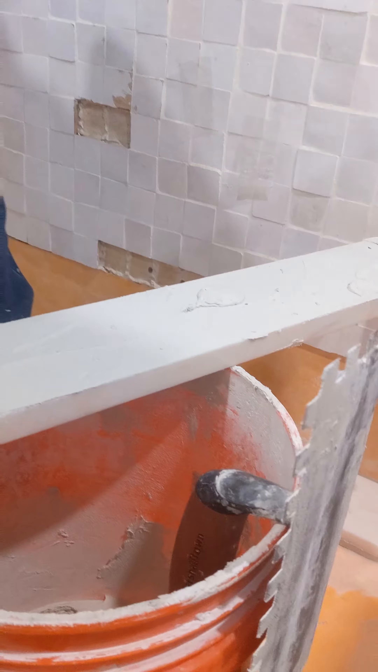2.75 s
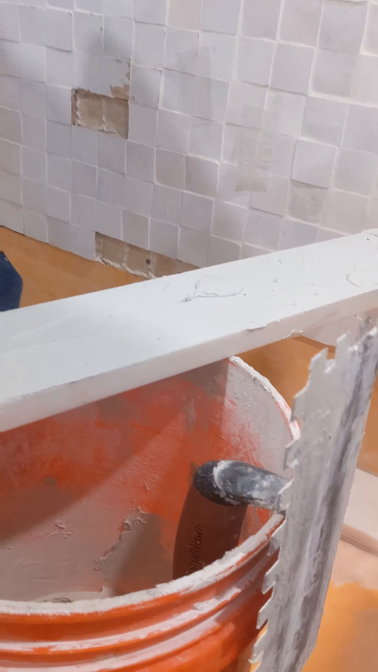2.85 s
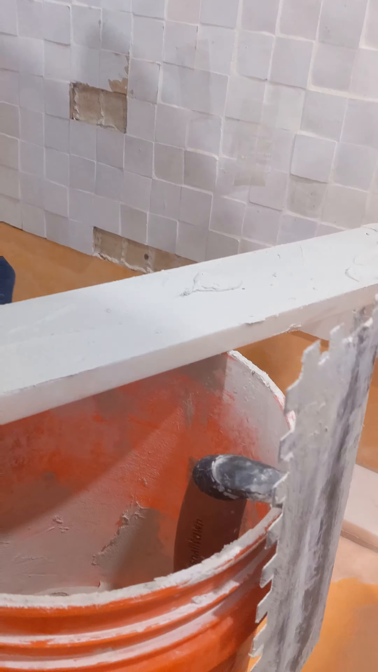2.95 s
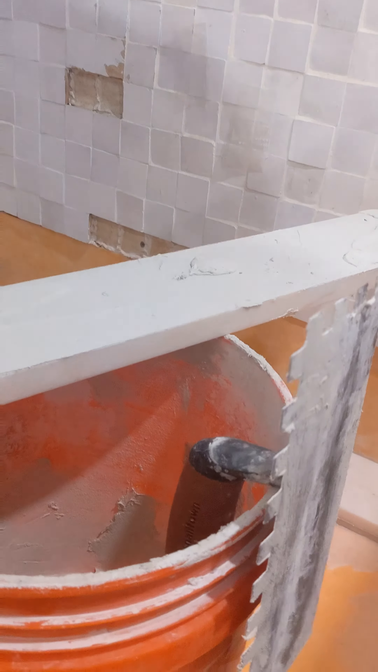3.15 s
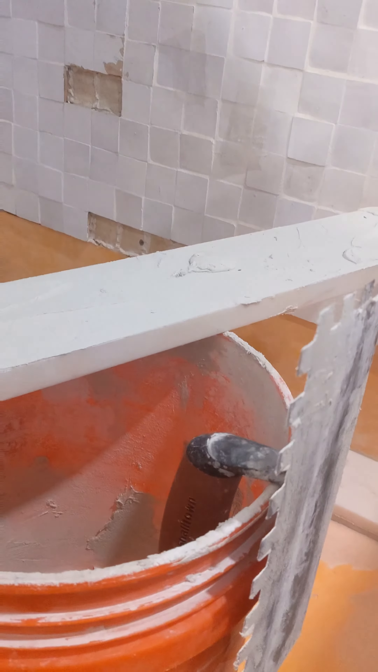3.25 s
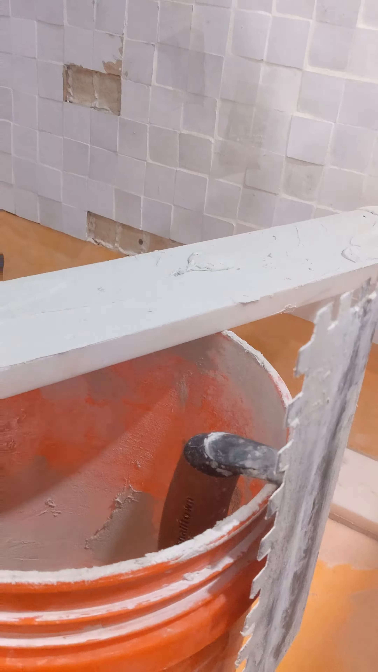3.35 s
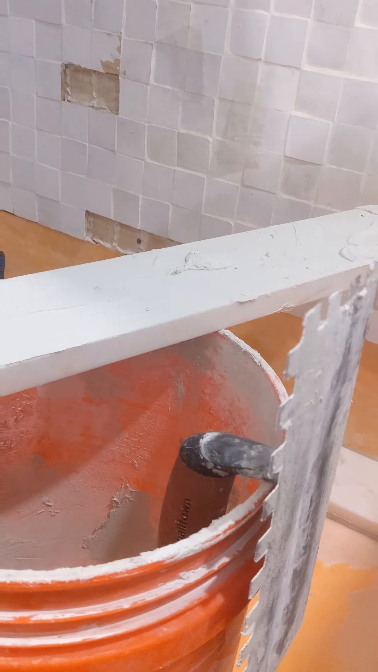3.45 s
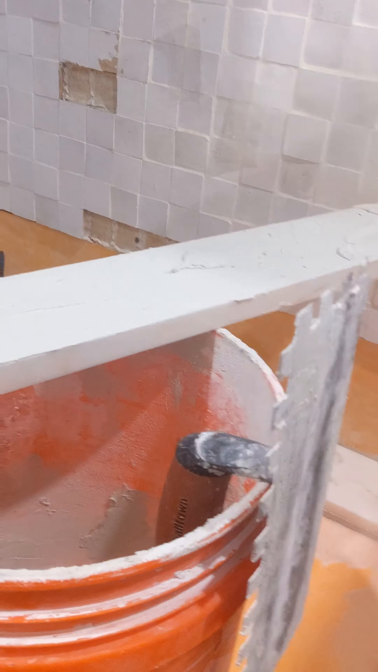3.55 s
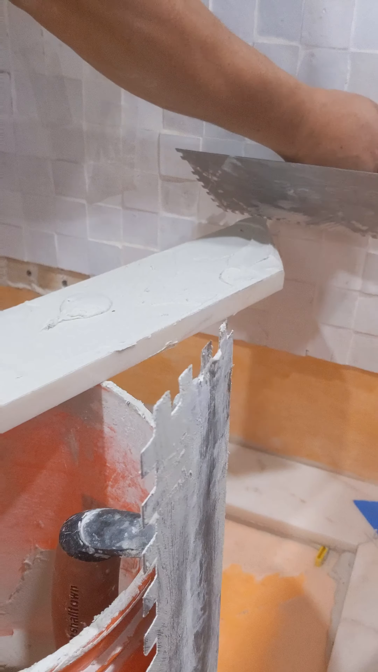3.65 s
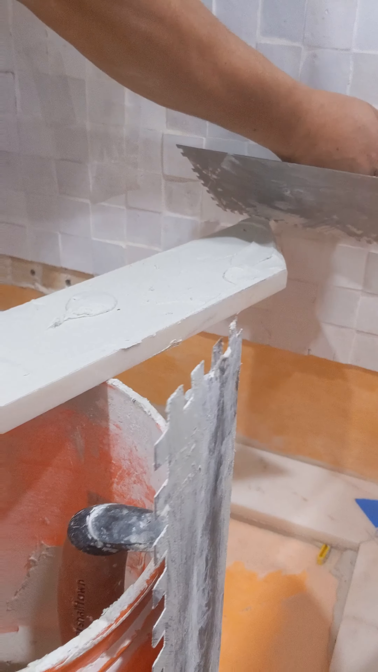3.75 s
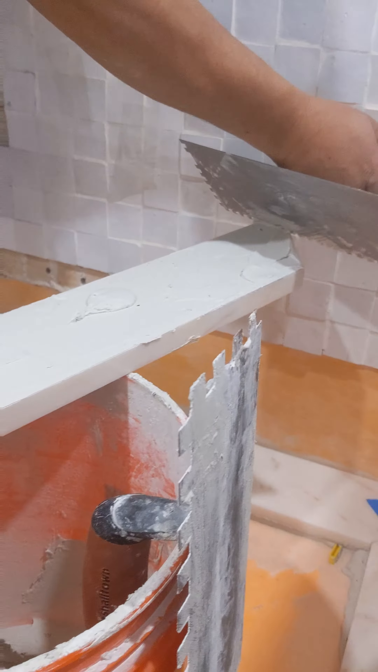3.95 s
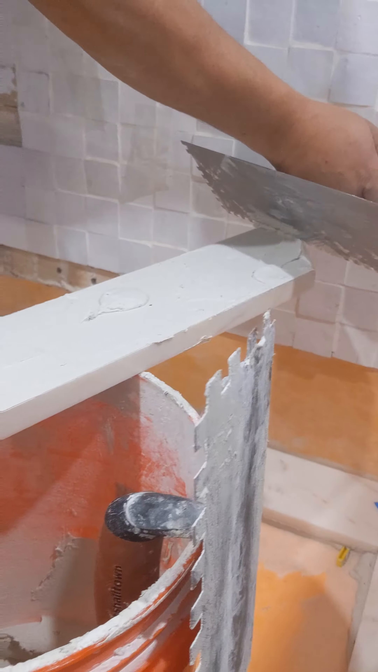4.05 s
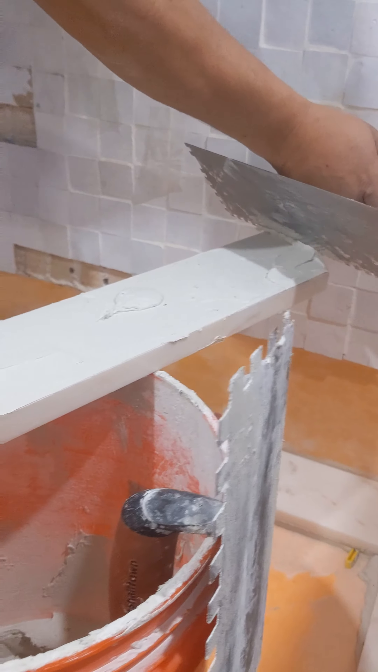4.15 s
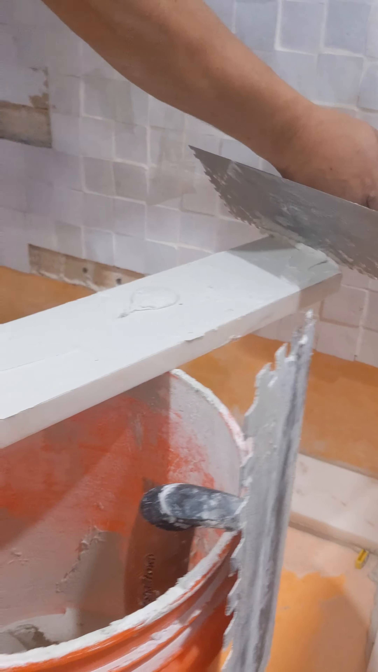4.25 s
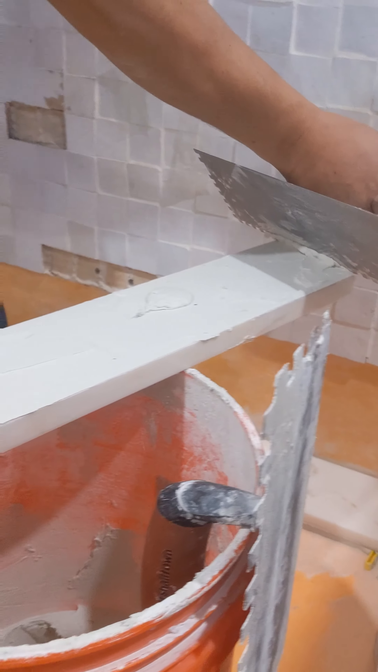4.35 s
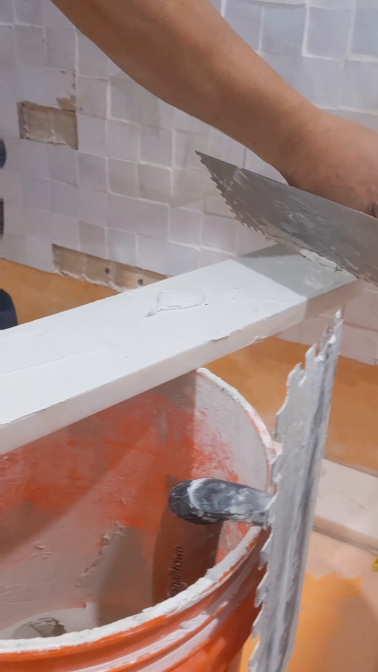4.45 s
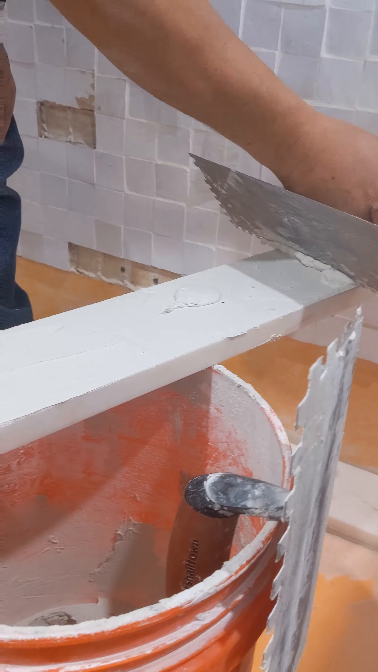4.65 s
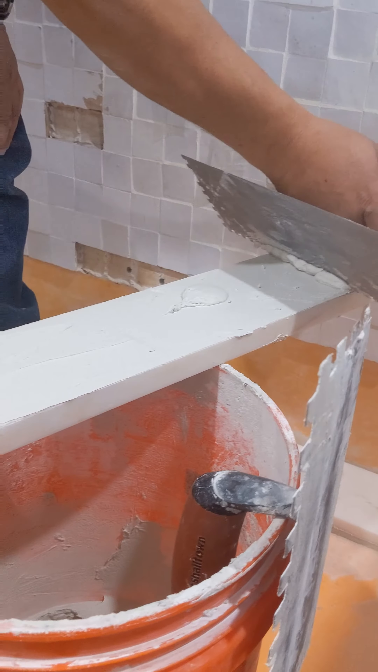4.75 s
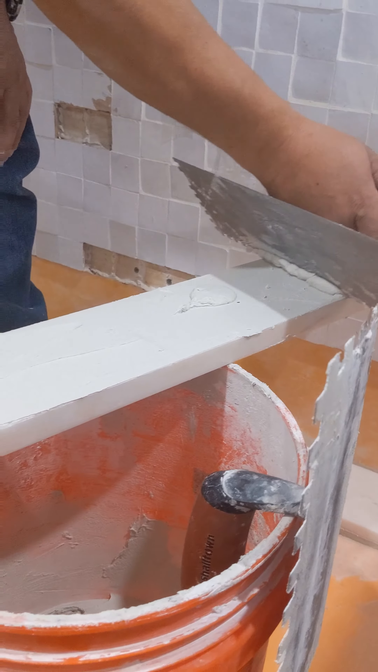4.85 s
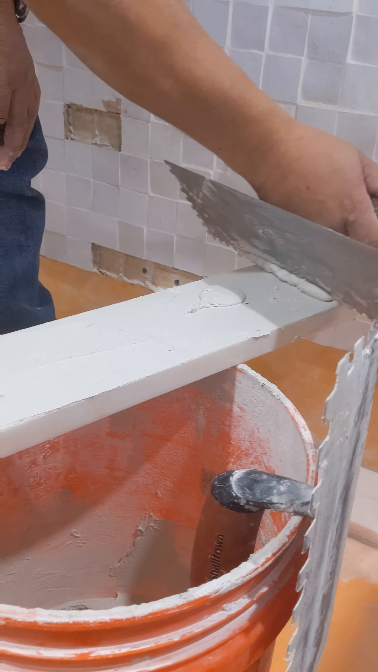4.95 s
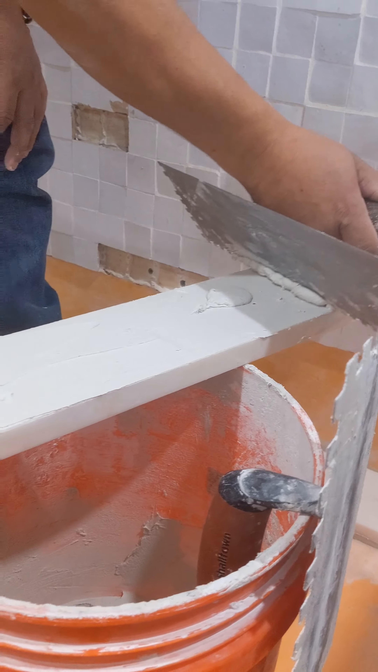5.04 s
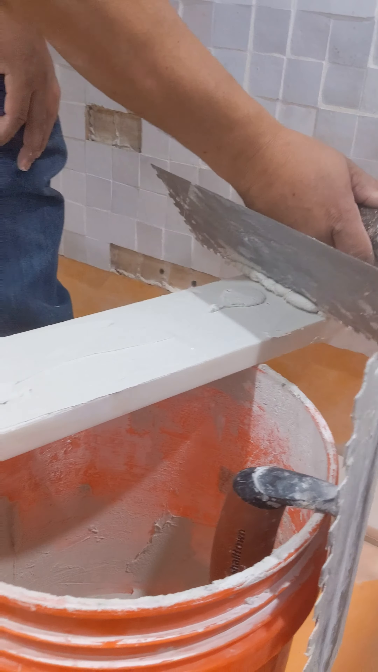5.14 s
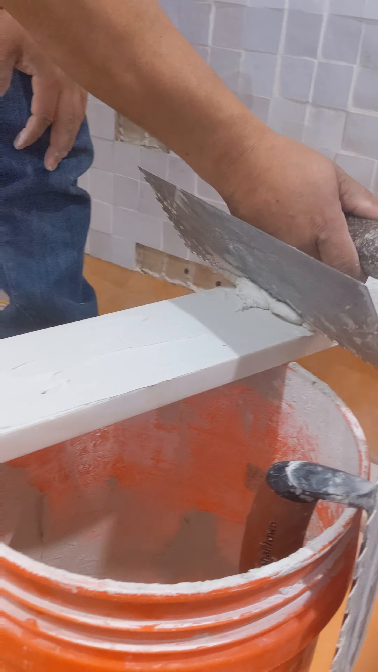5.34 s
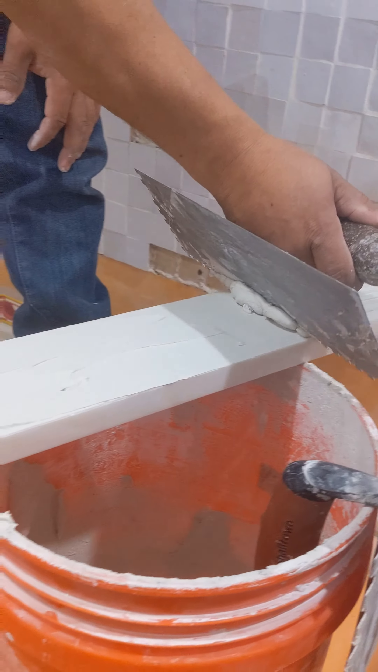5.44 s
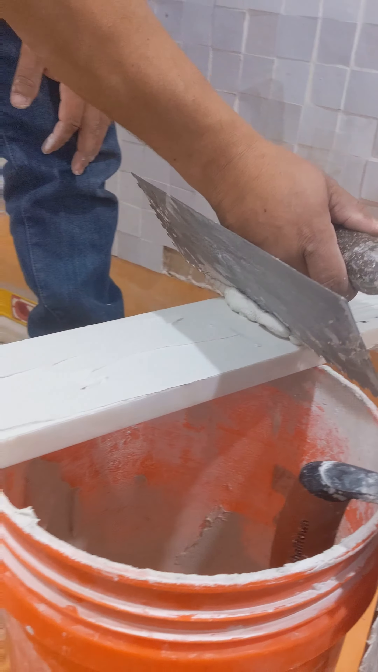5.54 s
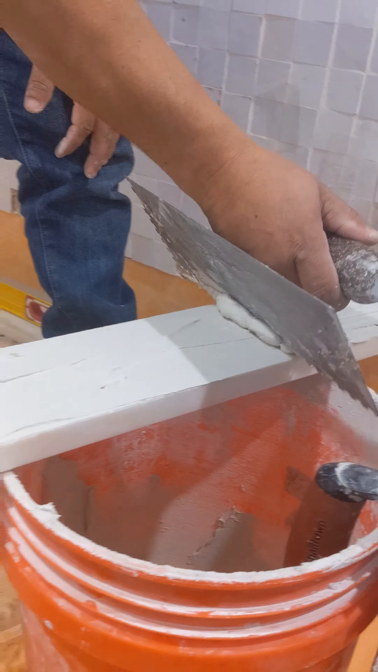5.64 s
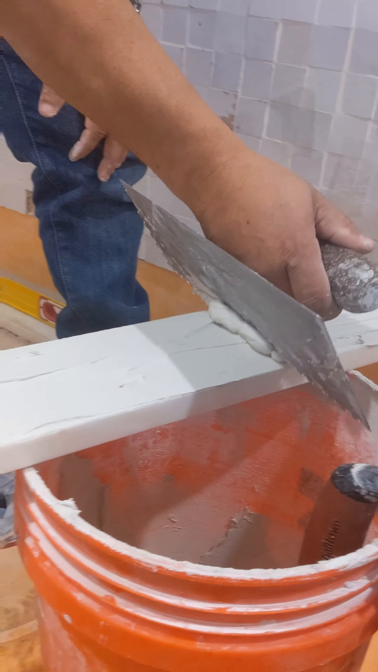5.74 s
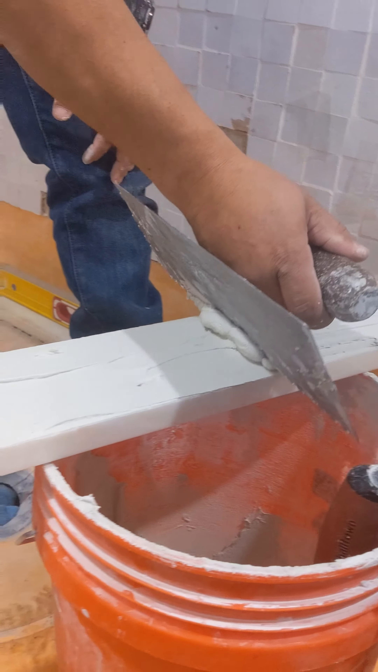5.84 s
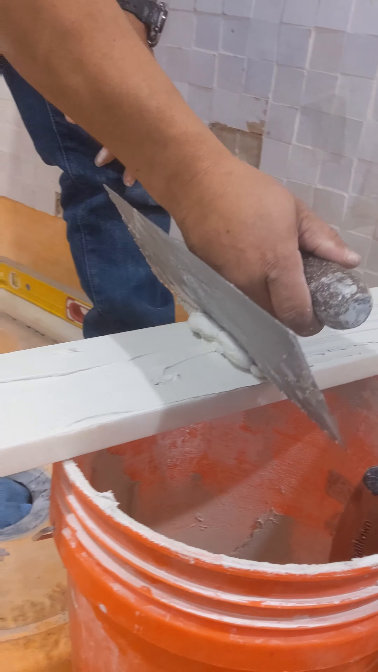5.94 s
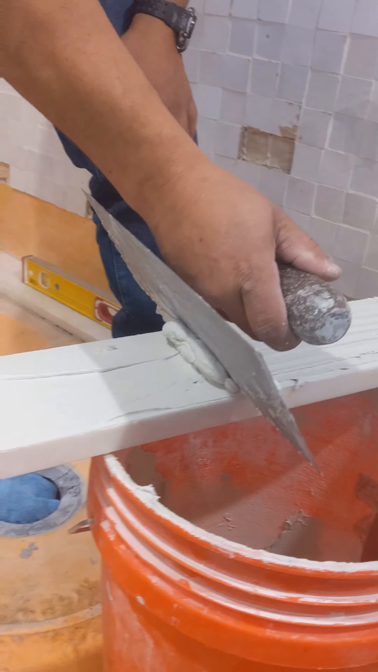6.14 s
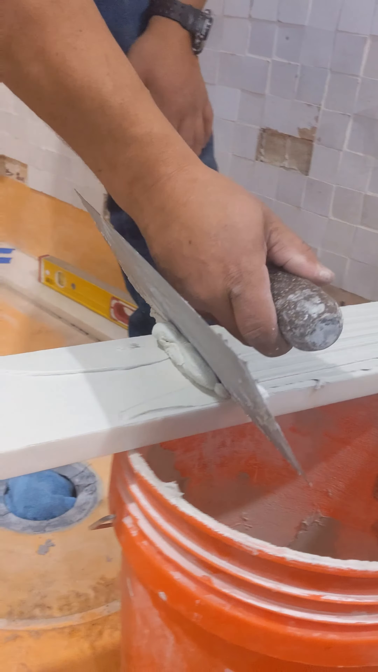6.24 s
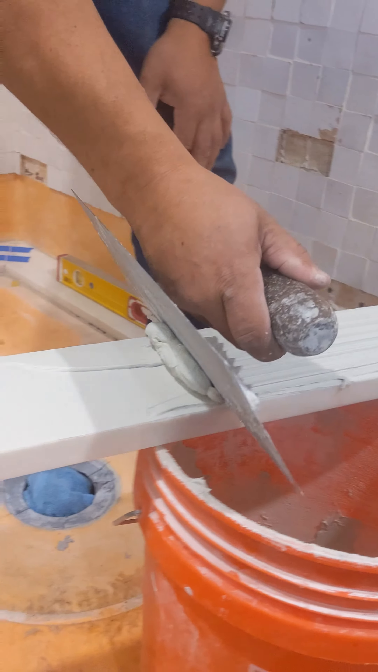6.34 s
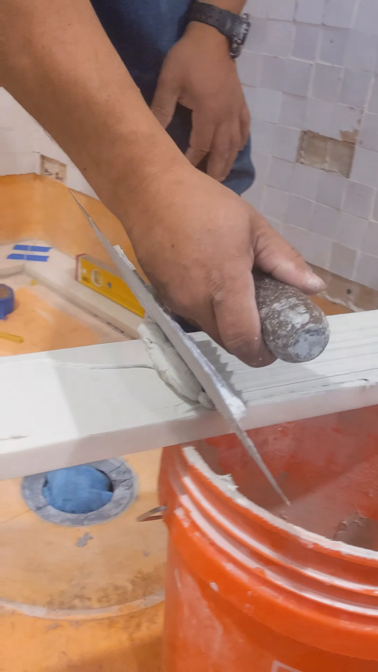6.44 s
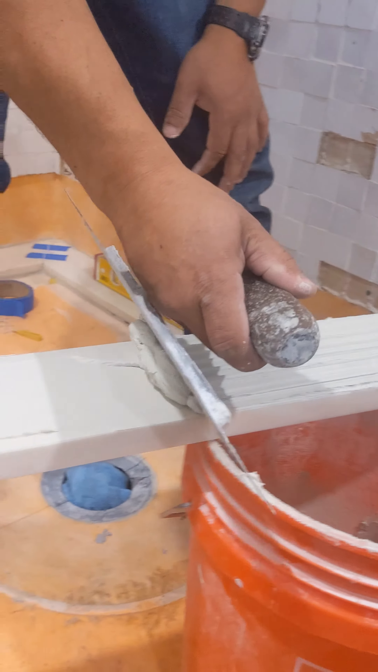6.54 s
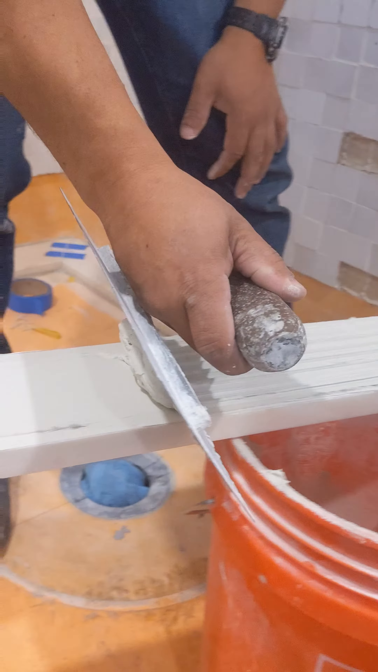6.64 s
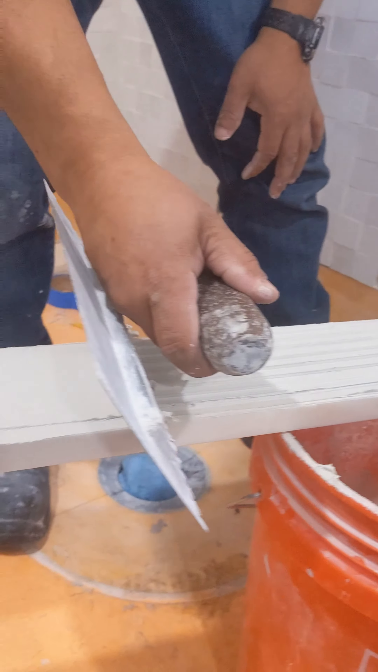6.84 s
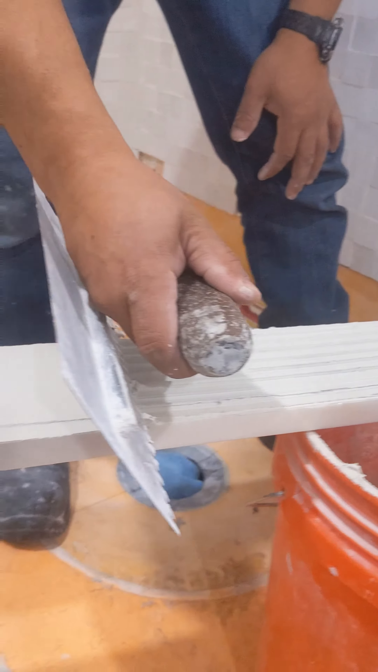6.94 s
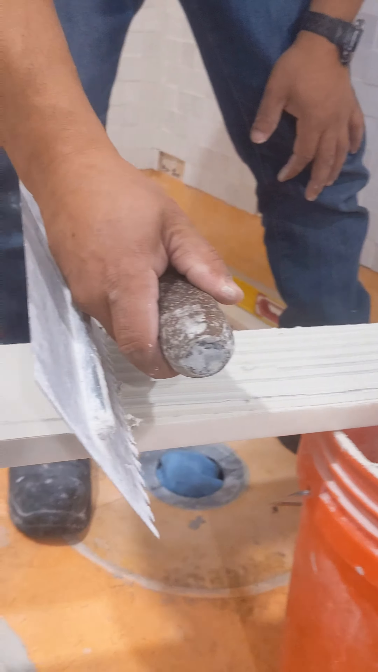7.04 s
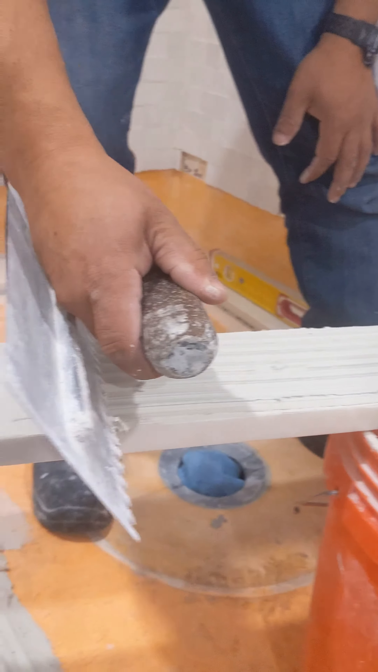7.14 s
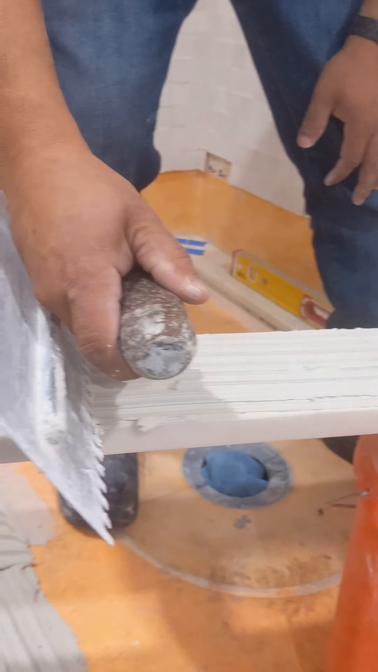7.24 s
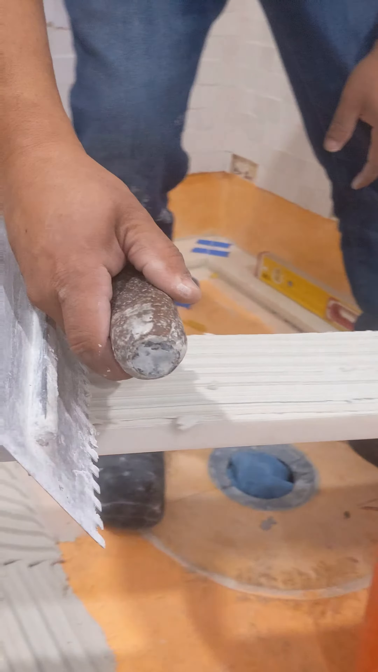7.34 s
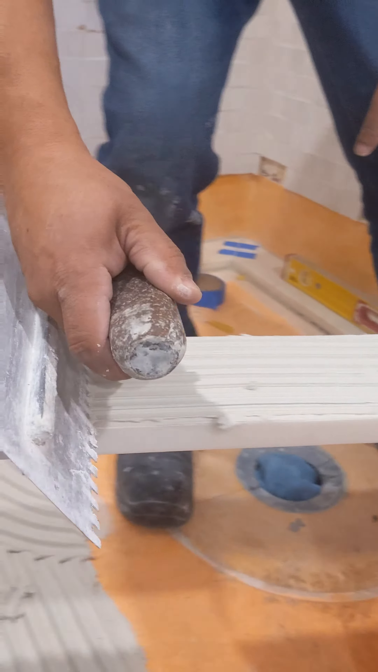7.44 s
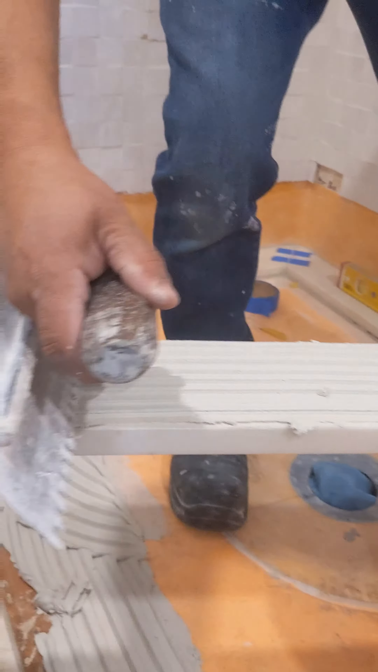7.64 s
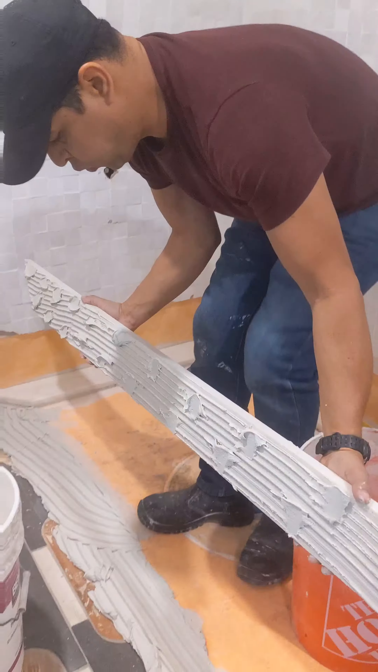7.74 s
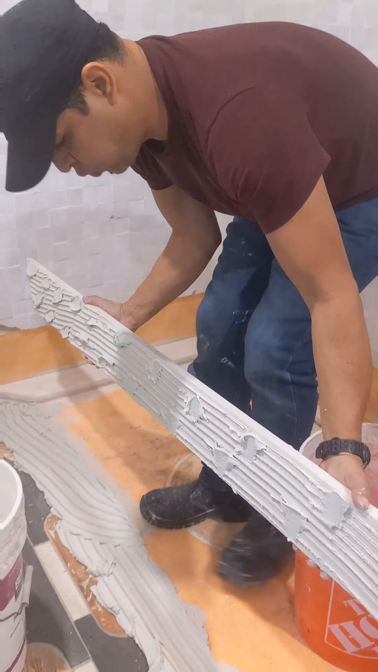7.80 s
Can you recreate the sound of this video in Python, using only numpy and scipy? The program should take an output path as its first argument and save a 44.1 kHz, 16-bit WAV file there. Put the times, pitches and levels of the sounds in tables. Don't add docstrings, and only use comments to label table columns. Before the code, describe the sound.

A gritty trowel scrape ends, hard knocks and rubs follow, then one long, harsh ringing scrape along stone gives way to quiet room hum.

```python
import sys
import numpy as np
from scipy import signal
from scipy.fft import rfft, irfft, next_fast_len
from scipy.io import wavfile
from scipy.ndimage import uniform_filter1d, map_coordinates

SR = 44100
rng = np.random.default_rng(int(sys.argv[2]) if len(sys.argv) > 2 else 0)


def boost_factor(decibels):
    exponent = np.asarray(decibels, float) / 20
    return 10 ** exponent


def store_wav(level_fs):
    pcm = np.round(np.clip(np.atleast_2d(level_fs), -1, 1) * 32767)
    wavfile.write(sys.argv[1], SR, pcm.T.astype(np.int16))


N = 400864
T = np.arange(N) / SR

# time_s, pressure_db, freedom of the blade to ring_db
STROKES = [
    [(0.0, -11, -11), (0.075, -22.5, 4), (0.11, -37, -11), (0.17, -70, 0)],
    [(3.7, -43.5, 4), (3.72, -52, 3), (3.73, -16.5, -2), (3.79, -20.5, -2.5), (3.82, -35, -4),
     (3.832, -20.5, -1.5), (4.05, -17.5, -0.5), (4.4, -20, -0.5), (4.8, -14.5, 0), (5.2, -15.5, 3.5),
     (5.75, -15, -1), (6.3, -16.5, -2), (6.7, -17.5, -3.5), (6.95, -15.5, 0), (7.35, -16, -5),
     (7.67, -15.5, -4)],
]
# time_s, delay_samples
LEFT_DELAY = [(0, 4.4), (3.7, 8.1), (5.2, 4), (6.2, 3.9), (7.2, 0.25), (9.1, 0.9)]
# time_s, place_0_to_1
BLADE_PLACE = [(0, .1), (3.72, 0), (7.67, 1), (9.1, 1)]
# time_s, peak_db
SLIPS = [(3.83, 1), (3.915, -14), (3.965, -10), (4.06, -13), (4.115, -2), (4.244, -10), (4.27, -6),
         (4.49, -15), (4.53, -18), (6.1739, -18), (6.4683, -17), (7.054, -14), (7.1577, -19)]
SLIP_S = 0.015
# pitch_hz, level_db per Hz
GRIT_COLOUR = [(200, -55), (3530, -22), (6000, -14), (7730, -9.5), (9160, -5), (9970, -3.5), (11600, 4.5),
               (13700, -3.5), (14900, -1.5), (15600, -2.5), (15900, -41), (16500, -78)]
# pitch_hz, level_db per Hz
HISS_COLOUR = [(120, -43), (1120, -10), (1900, -9), (2110, -4), (2380, -2.5), (3150, -3.5), (4400, -0.5),
               (5070, -3.5), (7500, -7.5), (9750, -16), (16500, -120)]
# pitch_hz, width_hz, level_db, place_0_to_1, reach_0_to_1
BLADE_TONES = [(1353.6, 46, 11.5, 0.01, 0.14), (1210, 32, -1, 0, 0.01), (1432, 49, 4, 0.12, 0.25),
               (1292, 51, 4.5, 0.31, 0.19), (1594, 55, 2, 0.19, 0.07), (1663, 49, -2, 0.32, 0.1),
               (1697, 56, 4, 0.47, 0.14), (1712.5, 45, 4.5, 0.79, 0.19), (1380, 64, 2, 0.59, 0.36),
               (1271, 36, 2, 0.8, 0.1), (1776, 46, -3.5, 0.46, 0.09), (1521, 118, 0.5, 0.57, 0.39),
               (2382, 51, -1.5, .05, 0.19), (2387, 61, -4.5, .6, 0.18)]
# pitch_hz, width_hz, level_db
EDGE_TONES = [(8830, 160, -8), (10100, 67, 2), (11800, 130, -3), (13400, 150, -8), (14700, 150, -10),
              (14950, 210, 1)]
# pitch_hz, width_hz, level_db, place_0_to_1, reach_0_to_1
SILL_TONES = [(84, 54, -2.5, 0.063, 0.24), (103.5, 12, -6, 0.076, 0.246), (148, 17, -0.5, 0.064, 1),
              (198, 20, 2.5, 0.59, 0.47), (299, 19, 2.5, 0.082, 0.33), (424, 30, -1.5, 0.36, 0.18),
              (623, 263, 3, 0.84, 0.2), (667, 35, 10.5, 0.11, 0.33), (813, 116, 5.5, 0.1, 0.3),
              (886, 92, 2.5, 0.46, 0.12), (1034, 21, 13.5, 0.42, 0.1), (1104, 64, 9, 0.563, 0.078),
              (500, 46, -3.5, 0.66, .15)]
# pitch_hz, width_hz, level_db
LIFTED_TONES = [(1195, 33, -1), (1304, 40, -4.5), (1425, 22, -1)]
LIFTED_DB, LIFTED_FALL_DB_PER_S = -26, 103
BLADE_DB, SILL_DB, HISS_DB, EDGE_TONES_DB = -5, -14.5, -7.5, -11
SILL_SHARE = 0.16
FIRST_SILL_DB, FIRST_HISS_DB = -22, 4.5

# pitch_hz, level_db per Hz
HUM_COLOUR = [(15, -61.5), (25, -35), (45, -4.5), (80, -13.5), (125, -1), (230, -7), (330, -10.5),
              (800, -17), (1000, -19), (1700, -18.5), (4000, -27), (7500, -35), (11500, -32), (14000, -39),
              (16000, -41.5)]
HUM_DB = -46

# start_s, blow_db, crack_db,
# left_minus_right_db
KNOCKS = [(0.5897, -12.5, -13.5, 4), (1.3585, -6, -16, -10), (1.949, -7.5, -16.5, 10),
          (2.077, -21.5, -40, 9), (2.2285, -14, -35, 11.5), (2.926, -10, -36, -3), (2.137, -7.5, -45, 6),
          (2.322, -17.5, -41, 6.5), (2.947, -11.5, -39, -3), (.603, -12, -40, -0.5), (2.99, -18.5, -50, -2),
          (2.936, -12, -45, -3), (2.958, -16.5, -45, -3)]
# pitch_hz, level_db, time to fall 60 dB_s
KNOCK_TONES = [
    [(470, -18, .1), (720, -8, .06), (1100, 4, 0.044), (1280, 6, 0.029), (1880, 1, .02)],
    [(140, -16, 0.11), (193.4, -7, .15), (990, -21, .08), (1525, -5, 0.046), (1920, -12, 0.049),
     (2937, -2.5, 0.033), (3400, -11, 0.026)],
    [(188, 3, 0.12), (940, 0, 0.03), (1300, -7, .03), (1720, 8, 0.03), (1840, 6, 0.04), (2100, -1, .03),
     (2910, -5, 0.036), (5600, 0.5, .03)],
    [(89, 3, 0.49), (153, -14.5, 0.23), (200, 1.5, 0.26), (370, 11, 0.057), (937, -12, 0.055),
     (1350, -10, .06)],
    [(1800, -0.5, 0.031), (2070, -7.5, 0.073), (3340, -1, 0.013), (4550, -12, .03)],
    [(1580, 12, 0.17), (1560, -8, 0.079), (1400, -14, .06), (300, -5, 0.13)],
    [(99.8, -2, 0.36), (151.4, -0.58, 0.084), (240, 0, 0.13)],
    [(98, -3.5, .2), (196, -5, .15), (299, -7, .12)],
    [(1596, 9, 0.12), (1430, -15, .2), (770, -10, .1), (2430, -14, .08)],
    [(160.4, -17, .27), (296, 0.5, 0.2), (464, -8, 0.38), (644, -8, .25), (804.5, -3, .18)],
    [(1390, -4, .12), (1350, 1, 0.11), (788, -8, 0.148), (240, 0, .25)],
    [(1583, 4, .09), (1630, -1, .07), (300, -1, .1)],
    [(1620, 2, .06), (1480, 1, .07), (740, -1, .15), (239, 2, .2)],
]
# start_s, peak_db, centre_hz, left_minus_right_db
CRUMBS = [(.476, -43, 12000, 3), (.5506, -33, 5000, 3), (0.58, -20, 5000, 4), (2.2387, -17.5, 11000, 11),
          (2.2445, -27, 9000, 4), (2.366, -41, 12000, 6), (1.891, -39, 4800, 12), (1.995, -28, 2500, 7),
          (2.342, -29, 1760, 4), (2.4428, -40, 7000, 7), (2.531, -36, 6100, 10), (3.3816, -35, 6030, 2),
          (3.392, -42, 5000, 2)]

TURNS_S = [.9, 1.29, 1.9, 2.8, 3.1, 7, 9]
# air against the rasp_db, then fall of rasp, body and boom_db per s
THINGS = [
    (-4, 1600, 970, 550),
    (-7.5, 570, 590, 497),
    (-6, 980, 294, 246),
    (-9.5, 370, 680, 257),
    (-7, 280, 640, 225),
    (1, 250, 340, 300),
    (1, 290, 300, 193),
    (0, 295, 330, 292),
]
# pitch_hz, level_db per Hz
RASP_COLOUR = [(1120, -51), (1900, -3), (3040, 1.5), (4170, -1.5), (5880, -2.5), (9080, -6.5),
               (12400, -16.5), (15500, -25), (16100, -21), (16500, -110)]
# pitch_hz, width_hz, level_db
BODY_TONES = [
    [(695, 33, 5), (803, 50, 4.5), (1130, 57, -7.5), (1830, 450, 0.5)],
    [(1320, 350, -4), (2000, 630, 4)],
    [(1400, 510, 9.5), (1880, 660, 14.5), (3170, 2300, -4.5)],
    [(900, 250, 14), (1400, 530, 21.5), (2070, 330, -5.5), (3100, 940, -26.5)],
    [(790, 38, -1), (1374, 47, 5.5), (1570, 72, 3.5), (2560, 230, -3.5)],
    [(804, 8, 3), (1323, 25, 1), (1600, 60, -7)],
    [(1110, 900, 13), (1310, 63, 27), (1800, 90, 19), (3390, 72, 18), (3780, 90, 4)],
    [(1524, 600, 0)],
]
# pitch_hz, width_hz, level_db
BUCKET_TONES = [
    [(180, 30, -1), (292.5, 18, 2), (480, 22, 1)],
    [(200, 120, 0)],
    [(112, 37, -11), (155.5, 35, 10), (197, 25.5, -3), (310, 60, -9.5)],
    [(86.4, 30, 1.5), (172, 51, 7.5), (226, 32, 6.5), (279, 43, -0.5), (311, 31, 2), (400, 240, -7.5)],
    [(110, 62, -5.5), (203, 24, 2), (270, 45, -3), (430, 32, -14)],
    [(150, 60, -7), (300, 80, -8)],
    [(203, 26, 0.5), (397, 250, -10.5)],
    [(200, 150, 0)],
]
# start_s, rasp_db, body_db, boom_db
JOLTS = [(0.587, -14.5, -9, -23), (1.357, -14, -14.5, -17.5), (1.946, -28, -12.5, -29),
         (1.991, -26, -21, -22), (2.078, -15, -11.5, -5.5), (2.228, -38, -21, -25),
         (2.236, -37, -19.5, -21), (8.172, -56, -64, -66), (8.72, -63, -69, -65.5), (2.326, -37, -26, -25),
         (9.062, -42, -49, -52)]
# start_s, length_s, rasp_db, body_db, boom_db
RUBS = [(0.535, 0.038, -39, -51, -60), (0.599, 0.033, -46, -28, -25), (3.37, 0.038, -49, -64, -62),
        (3.167, 0.22, -62, -55, -64), (2.892, 0.017, -20.5, -16.5, -24), (7.961, 0.013, -36.5, -41, -40.5),
        (7.973, 0.068, -62, -49, -42), (0.91, 0.19, -46.5, -46.5, -51), (1.1, 0.1, -37, -36, -40),
        (1.309, 0.019, -30, -31.5, -32), (1.404, 0.11, -45, -38, -46), (1.545, 0.1, -40, -39.5, -43),
        (1.991, 0.099, -20.5, -12.5, -32), (2.1, 0.064, -44, -24, -23), (2.897, 0.067, -30.5, -18.5, -20.5),
        (3.1, 0.037, -50.5, -49.5, -59), (3.259, 0.046, -54.5, -55.5, -60),
        (3.318, 0.065, -51.5, -57, -64.5), (3.492, 0.16, -51.5, -55, -62), (7.497, 0.37, -42, -39, -40),
        (7.856, 0.1, -51, -41.5, -55), (8.102, .05, -64, -56, -60)]
JOLT_S, SWELL_SHARE = 0.0044, 0.7

# time_s, pitch_hz, level_db
SQUEAK = [(7.99, 1000, -70), (8.02, 1035, -41), (8.07, 1050, -47), (8.12, 1205, -46), (8.17, 1250, -66)]

# pitch_hz, time to fall 60 dB_s
ROOM_FADE = [(100, 0.39), (1000, 0.35), (5000, 0.27), (15000, 0.2)]
# pitch_hz, likeness_0_to_1
LIKENESS = [(60, 0.88), (300, 0.75), (640, 0.64), (1300, 0), (16000, 0.03)]
# pitch_hz, left_minus_right_db
MICROPHONES = [(60, 2), (110, 0), (200, 0), (380, -1), (700, -0.5), (1290, 0.5), (2380, 0.0), (4400, 1),
               (8120, 2.5), (15000, 3.5)]
# time_s, level_db
SCENE_CHANGES = [(0, 0), (3.598, 0), (3.601, -80), (3.699, -60), (3.703, -16), (3.724, 0), (7.6525, 0),
                 (7.654, -15), (7.66, -20), (7.665, -38), (7.686, -68), (7.692, -68), (7.694, -36),
                 (7.71, 0), (9.1, 0)]
LAST_CHANGE_S = 7.69
BASS_CUT_HZ, TOP_HZ = 62, 15550


def over_time(points):
    return np.interp(T, *np.transpose(points))


def unit(x):
    return x / np.sqrt(np.mean(x ** 2))


def on_log(points, hz):
    f, v = np.transpose(points)
    return np.interp(np.log(hz + 1), np.log(f), v)


def shape(x, gain):
    size = next_fast_len(x.shape[-1])
    spectrum = rfft(x, size) * gain(np.fft.rfftfreq(size, 1 / SR))
    return irfft(spectrum, size)[..., :x.shape[-1]]


def colour(x, points):
    return unit(shape(x, lambda hz: boost_factor(on_log(points, hz))))


def band(x, lo_hz, hi_hz):
    sos = signal.butter(2, [lo_hz, min(hi_hz, SR / 2.1)], "band", fs=SR, output="sos")
    return unit(signal.sosfilt(sos, x))


def ring(x, hz, width):
    return signal.lfilter(*signal.iirpeak(hz, hz / width, SR), x)


def body(x, tones):
    return unit(sum((-1) ** k * boost_factor(db) * ring(x, hz, width) for k, (hz, width, db) in enumerate(tones)))


def walk(rate):
    k = int(SR / rate)
    steps = np.repeat(rng.standard_normal(N // k + 1), k)
    return uniform_filter1d(uniform_filter1d(steps, k), k)[:N]


def grains(share, scatter_db):
    chance, sign, size = rng.random(N), rng.standard_normal(N), rng.exponential(size=N)
    return unit((chance < share) * sign * boost_factor(scatter_db * size))


def two_sides(one, other):
    def likeness(hz):
        return np.clip(on_log(LIKENESS, hz), 0, 1)
    mid = shape(one, lambda hz: np.sqrt((1 + likeness(hz)) / 2))
    side = shape(other, lambda hz: np.sqrt((1 - likeness(hz)) / 2))
    return np.array([mid + side, mid - side])


def late_left(x):
    return np.array([map_coordinates(x, [np.arange(N) - over_time(LEFT_DELAY)], order=1), x])


def panned(x, pan_db):
    return x * boost_factor(np.array([pan_db, -pan_db]) / 2)


def stroke_controls(tables):
    gate = 0
    for t in tables:
        start, end = t[0][0], t[-1][0]
        gate = gate + np.interp(T, [start - .004, start, end, end + 0.011], [0, 1, 1, 0])
    s, *columns = np.transpose(np.vstack(tables))
    return np.minimum(gate, 1), [np.interp(T, s, c) for c in columns]


def along(x, tones):
    place, out = over_time(BLADE_PLACE), 0
    for hz, width, db, best, reach in tones:
        away_db = np.maximum(-6 * ((place - best) / reach) ** 2, -16)
        tone = ring(ring(x, hz, 1.64 * width), hz, 1.64 * width)
        out = out + boost_factor(db + away_db + 1.2 * walk(9)) * tone
    return unit(out)


def trowel():
    gate, (pressure_db, free_db) = stroke_controls(STROKES)
    first = T < 1
    sand = np.array([grains(.2, 3.13) for _ in range(3)]) * boost_factor(0.43 * walk(25.18))
    crunch = colour(sand, GRIT_COLOUR)
    steel = boost_factor(EDGE_TONES_DB) * body(sand, EDGE_TONES)
    hiss = boost_factor(HISS_DB + FIRST_HISS_DB * first) * colour(sand, HISS_COLOUR)
    edge = crunch + steel + hiss

    lumps = grains(.15, 1.8) * boost_factor(1.2 * walk(80))
    blade = along(lumps, BLADE_TONES) + 0.47 * band(band(lumps, 1123, 1960), 1123, 1960)
    sill = band(along(lumps, SILL_TONES), 85, 1170) + 0.33 * band(lumps, 370, 1080)
    sill_db = SILL_DB + SILL_SHARE * free_db + FIRST_SILL_DB * first
    rings = boost_factor(BLADE_DB + free_db) * blade + boost_factor(sill_db) * sill
    direct = boost_factor(-5.5) * late_left(rings + 0.56 * edge[0]) + boost_factor(-3.5) * edge[1:]

    push = gate * boost_factor(pressure_db)
    force = push + sum(boost_factor(db - 9.0) * np.exp(-np.abs(T - s) / SLIP_S) * (T > s) for s, db in SLIPS)
    lifted = boost_factor(LIFTED_DB - LIFTED_FALL_DB_PER_S * T) * body(lumps, LIFTED_TONES)
    return force * direct + late_left(lifted), push * boost_factor(-2.0) * (rings + edge[0])


def hum():
    one, other = colour(rng.standard_normal((2, N)), HUM_COLOUR)
    return boost_factor(HUM_DB + 0.14 * walk(2.89)) * two_sides(one, other)


def damped(hz):
    return min(150 / hz, .3)


def knocks():
    out, t = np.zeros((2, N)), np.arange(SR // 3) / SR
    for (s, blow_db, crack_db, pan_db), tones in zip(KNOCKS, KNOCK_TONES):
        tone = 0
        for hz, db, t60 in tones:
            fade = 1000. ** (-t / min(t60, damped(hz)))
            tone = tone + boost_factor(db) * np.sin(2 * np.pi * hz * t) * fade
        chatter = 0.089 * rng.standard_normal(len(t)) * np.exp(-t / 0.0092) + (t == 0)
        tone = signal.fftconvolve(tone, chatter)[:len(t)]
        crack = band(rng.standard_normal(len(t)), 1440, 13000) * np.exp(-t / 0.0029)
        hit = boost_factor(blow_db) * tone / np.max(np.abs(tone)) + boost_factor(crack_db - 3.0) * crack
        out[:, int(s * SR):int(s * SR) + len(t)] += panned(hit[None], np.array([pan_db]))
    for s, db, hz, pan_db in CRUMBS:
        tick = band(rng.standard_normal(len(t)), hz / 3.7, hz * 2.0) * np.exp(-t / 0.0033)
        out[:, int(s * SR):int(s * SR) + len(t)] += boost_factor(db - 4.5) * panned(tick[None], np.array([pan_db]))
    return boost_factor(-1.5) * out, boost_factor(-8.5) * out.mean(axis=0)


def moves():
    force, t = np.zeros((len(THINGS), 3, N + SR)), np.arange(SR) / SR
    rows = [(s, JOLT_S, JOLT_S, db) for s, *db in JOLTS]
    rows += [(s, SWELL_SHARE * length, length, db) for s, length, *db in RUBS]
    for s, rise, length, db in rows:
        k = np.searchsorted(TURNS_S, s)
        fall_db = np.abs(THINGS[k][1:])[:, None] * np.maximum(t - length, 0)
        push = np.clip(t / rise, 0, 1) * boost_factor(np.array(db)[:, None] - fall_db)
        force[k, :, int(s * SR):int(s * SR) + SR] += push
    return force[..., :N] * (np.abs(T - LAST_CHANGE_S + .05) > .05)


def per_thing(x, bodies, forces):
    return sum(force * body(x, tones) for force, tones in zip(forces, bodies))


def shuffles():
    rasp_force, body_force, boom_force = moves().transpose(1, 0, 2)
    air_force = boost_factor(np.array(THINGS)[:, 0]) @ rasp_force
    slip = grains(.3, 2) * boost_factor(2.5 * walk(60))
    rasp = colour(slip, RASP_COLOUR)
    scrape = rasp_force.sum(axis=0) * band(rasp, 1970, 9100)
    air = air_force * band(rasp, 11340, 15600)
    wall = 0.77 * band(slip, 680, 3760) * body_force.sum(axis=0) + per_thing(slip, BODY_TONES, body_force)
    hollow = per_thing(grains(0.022, 3.3), BUCKET_TONES, boom_force)
    dry = scrape + air + wall + hollow
    near = two_sides(dry, np.roll(dry, SR // 3000))
    return boost_factor(-3.5) * near, boost_factor(-7.5) * dry


def squeak():
    s, hz, db = np.transpose(SQUEAK)
    pitch = np.interp(T, s, hz) * (1 + .05 * walk(300))
    level = boost_factor(np.interp(T, s, db, -120, -120) + 6.4 * walk(45))
    note = level * np.sin(2 * np.pi * np.cumsum(pitch) / SR)
    return late_left(note), boost_factor(-11.0) * note


def room(x, size=8192):
    t = np.arange(2 * size) / SR
    centres = 60 * 2. ** np.arange(9)
    noise = np.array([band(rng.standard_normal((2, 4 * size)), hz / np.sqrt(2), hz * np.sqrt(2))
                      for hz in centres])
    fade = 1000. ** (-t / on_log(ROOM_FADE, centres)[:, None])
    fade = np.sqrt(centres)[:, None] * fade * np.clip(t / 0.0023, 0, 1)
    window = np.sin(np.pi * np.arange(2 * size) / (2 * size))
    x, out = np.pad(x, (size, 2 * size)), np.zeros((2, N + 7 * size))
    for i in range(0, N + size, size):
        k = rng.integers(2 * size)
        if not x[i:i + 2 * size].any():
            continue
        tail = two_sides(*np.einsum("bct,bt->ct", noise[:, :, k:k + 2 * size], fade))
        tail = tail / np.sqrt(np.sum(tail ** 2) / 2)
        piece = x[i:i + 2 * size] * window
        out[:, i:i + 4 * size - 1] += signal.fftconvolve(piece[None], tail)
    return out[:, size:size + N]


def scene():
    direct, wet = map(sum, zip(trowel(), knocks(), shuffles(), squeak()))
    before = T < LAST_CHANGE_S
    return direct + before * room(before * wet) + room(~before * wet) + hum()


def roll_off(x):
    return signal.sosfilt(signal.butter(12, 16860, fs=SR, output="sos"), x)


def record(dry):
    def microphones(hz):
        bass_cut = np.sqrt(1 + (BASS_CUT_HZ / (hz + 1)) ** 6)
        return panned(0.98, on_log(MICROPHONES, hz)) / bass_cut
    heard = shape(dry, microphones)
    heard = np.tanh(1.1 * heard) / 1.1 * boost_factor(over_time(SCENE_CHANGES))
    heard = signal.sosfilt(signal.ellip(8, .3, 60, TOP_HZ, fs=SR, output="sos"), heard)
    return roll_off(heard)


dry = scene()
out = record(dry)
store_wav(out)
```